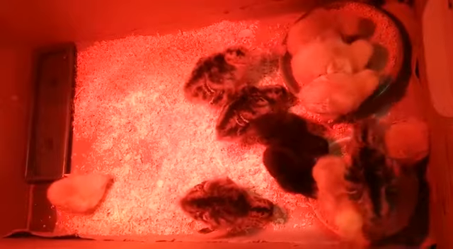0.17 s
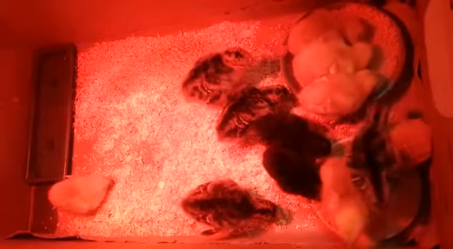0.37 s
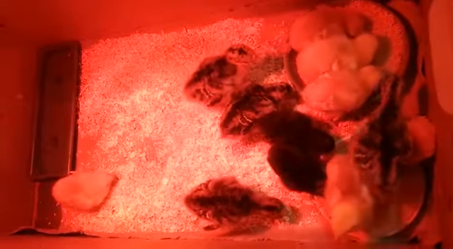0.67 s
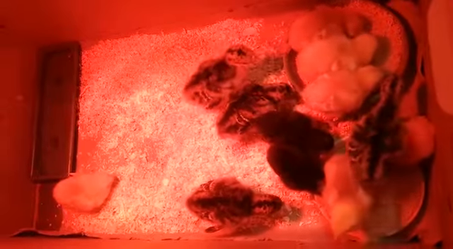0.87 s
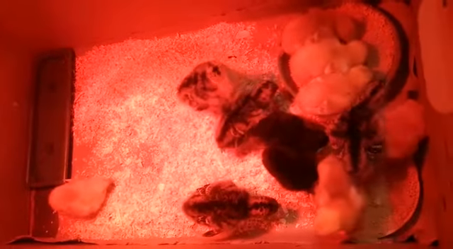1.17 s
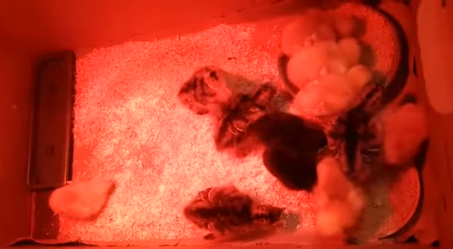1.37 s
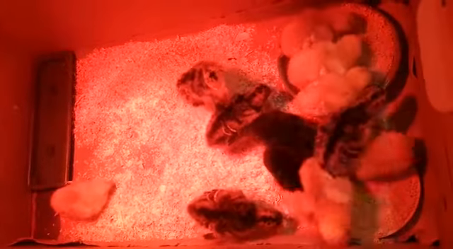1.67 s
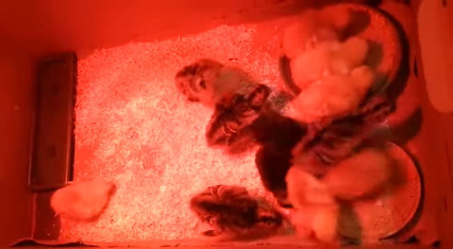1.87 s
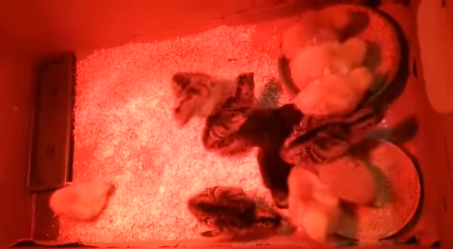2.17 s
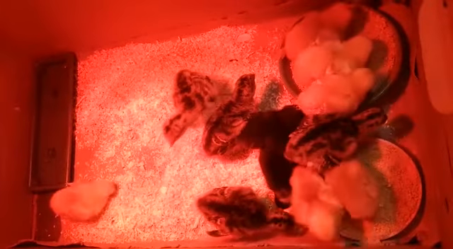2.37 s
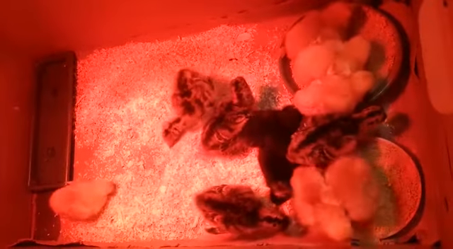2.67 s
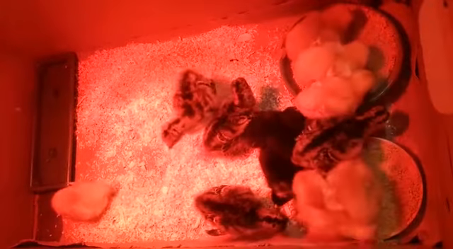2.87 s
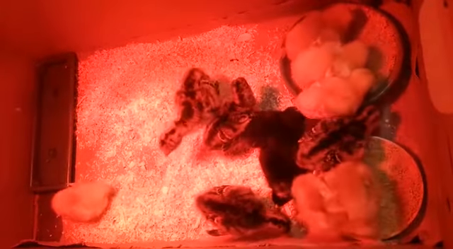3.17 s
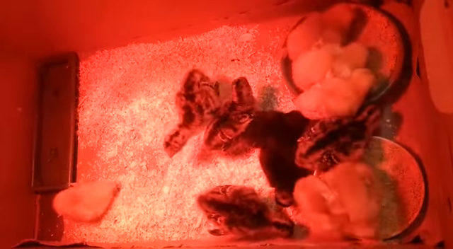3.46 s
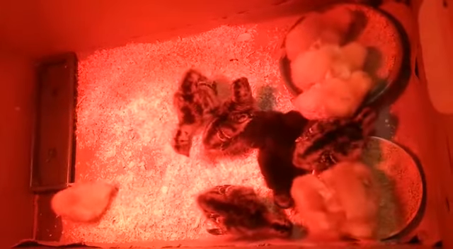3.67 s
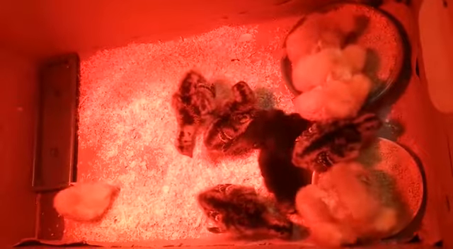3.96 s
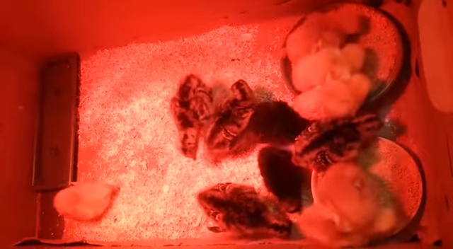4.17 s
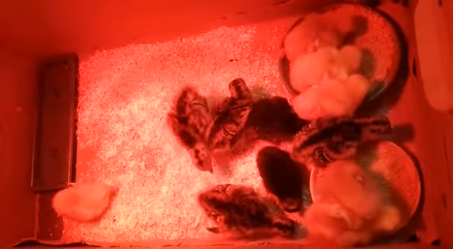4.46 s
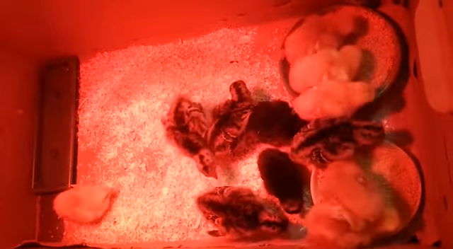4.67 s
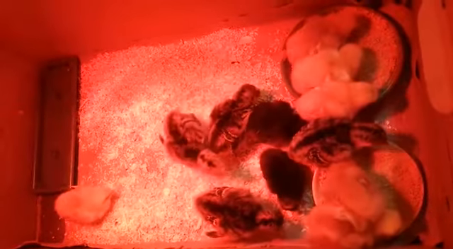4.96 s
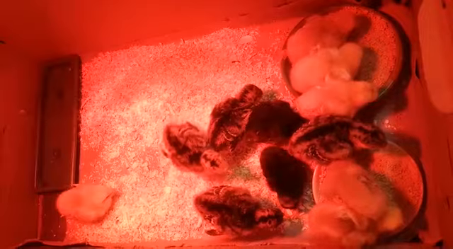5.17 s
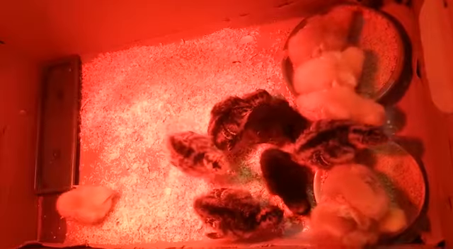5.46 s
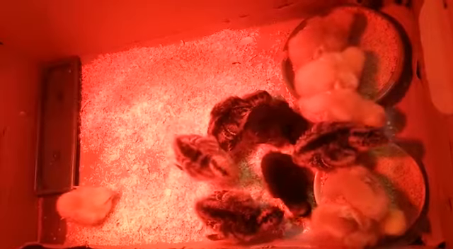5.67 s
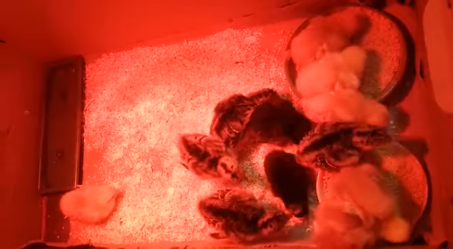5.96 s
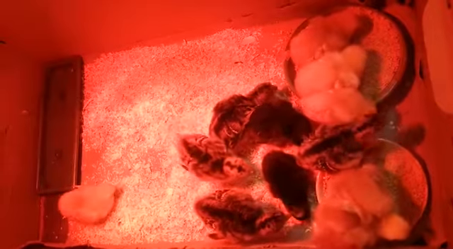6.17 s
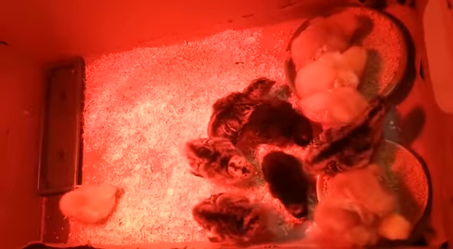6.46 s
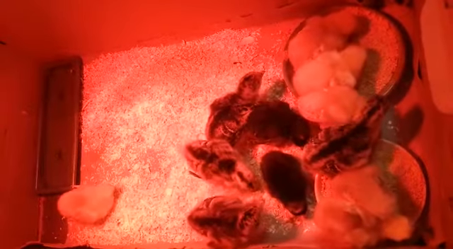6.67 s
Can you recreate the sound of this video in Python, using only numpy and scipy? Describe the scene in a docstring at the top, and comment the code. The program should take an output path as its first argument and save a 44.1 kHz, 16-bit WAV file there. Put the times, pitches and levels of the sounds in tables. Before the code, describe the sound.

Inside a plastic brooder box, chicks twitter with brief upturned peeps, irregular and overlapping. Pecking on the feeders comes in small gritty flurries, early on and strongest from about two to two and a half seconds, where feet also boom and knock on the box. Several loud descending cheeps follow in the middle. The end is lighter, with peeps in loose groups over soft rustling. Close stereo microphones above, leaning right; low room hum and hiss.

```python
"""A brood of young chicks twitters while feeding in a plastic brooder box, heard from just above it.
Whistled glides make the short, mostly upturned peeps, the louder falling cheeps and two faint whines.
Gritty noise bursts tick as beaks on the feeders; struck modes boom and knock as feet bump the box;
shaped noise scratches in the litter. Box and room echo the calls, ticks and bumps.
Below lie the hum and hiss of a small room."""
import sys
import numpy as np
from scipy import signal
from scipy.fft import rfft, irfft
from scipy.io import wavfile
from scipy.ndimage import uniform_filter1d

SR = 44100
rng = np.random.default_rng(int(sys.argv[2]) if len(sys.argv) > 2 else 0)


def store_pcm(level_fs):
    """Save levels as 16-bit WAV."""
    pcm = np.round(np.clip(level_fs, -1, 1) * 32767).astype(np.int16)
    wavfile.write(sys.argv[1], SR, np.atleast_2d(pcm).T)


N = 299880
TIME = np.arange(N) / SR


def undb(db):
    """Decibels to amplitude gain."""
    return 10 ** (np.asarray(db) / 20)


def unit(x):
    """Scale to rms 1."""
    return x / np.sqrt(np.mean(x ** 2))


def sides(pan_db):
    """Left and right gains, pan_db apart (left minus right), that keep the mean power."""
    gains = undb(np.array([[.5], [-.5]]) * pan_db)
    return gains / np.sqrt(np.mean(gains ** 2, axis=0))


def add(out, start_s, x):
    """Mix x into out from a start time."""
    i = max(int(start_s * SR), 0)
    out[:, i:i + x.shape[-1]] += x[..., :N - i]


def along(points, hz):
    """Read (Hz, dB) points on a log-frequency axis."""
    f, db = np.transpose(points)
    return np.interp(np.log(hz + 1), np.log(f), db)


def colour(x, points):
    """Causal minimum-phase filter with the given spectrum and unit power gain for white noise."""
    size = 4096
    bin_hz = np.arange(size // 2 + 1) * SR / size
    cepstrum = irfft(np.log(undb(along(points, bin_hz))))
    # folding the cepstrum onto positive time makes the filter causal
    cepstrum[1:size // 2] *= 2
    cepstrum[size // 2 + 1:] = 0
    h = irfft(np.exp(rfft(cepstrum)))
    return signal.fftconvolve(x, h[None] / np.linalg.norm(h))[:, :N]


def walk(rate):
    """Smooth random wander with rate knots per second, spread near 1.8."""
    knots = rng.standard_normal(8192)
    return 2.23 * np.interp(TIME * rate, np.arange(len(knots)), knots)


# Lean of the diffuse sound towards the right.
# Each row: frequency in Hz, left minus right in dB.
DIFFUSE_LEAN = [(100, -6.5), (1200, -5.5), (3000, -6.5), (5000, -1), (7500, -23), (10000, -7.5),
                (15000, -9)]


def spread(x, alike_hz=1900):
    """Two unrelated channels become alike in the bass and lean to the right."""
    hz = np.arange(N // 2 + 1) * SR / N
    mid, side = rfft(x)
    side = side * np.clip(hz / alike_hz, .08, 1)
    return irfft(np.array([mid + side, mid - side]) * sides(along(DIFFUSE_LEAN, hz)), N)


# Spectrum of the room's air. Each row: frequency in Hz, relative density in dB per Hz.
AIR_SPECTRUM = [(20, -11), (32, -15), (46, 5), (70, -9.5), (150, -21.5), (300, -21), (700, -23),
                (1500, -23), (3000, -27), (4500, -31), (7300, -32), (10000, -29.5), (15500, -32.5)]
# Mains hum. Each row: frequency in Hz, central rms level in dB.
MAINS_HUM = [(49, -68), (99, -67.5), (148, -72.5)]


def room_tone(air_db=-63, hum_pan_db=-5):
    """Noise gives soft rumble and hiss; sines wavering in level and phase give the mains hum."""
    air = spread(colour(rng.standard_normal((2, N)), AIR_SPECTRUM))
    air = air * undb(air_db + 1.2 * walk(1.8))
    hum = np.zeros(N)
    for hz, db in MAINS_HUM:
        level = undb(db + 3.3 * walk(50)) * np.sqrt(2)
        hum += level * np.sin(2 * np.pi * hz * TIME + 0.21 * walk(20))
    return air + hum * sides(hum_pan_db)


# Bouts of scratching in the litter.
# Each row: start in seconds, length in seconds, relative vigour in dB.
SCRATCH_BOUTS = [(0.009, 0.36, -60.5), (0.507, 1.23, -63), (0.723, 0.2, -54), (1.063, 0.44, -60),
                 (1.842, 0.33, -51), (2.23, 0.27, -56), (2.46, 0.25, -53), (2.799, 0.14, -55),
                 (3.44, 1.353, -64.5), (3.973, 0.33, -57), (5.39, 0.57, -64.5), (6.227, .18, -65)]
BOUT_ATTACK_S, BOUT_RELEASE_S = 0.037, 0.057
# stirring between the bouts; the faint stirring at which hiss, rustle and shuffle share one vigour
IDLE_DB, PIVOT_DB = -72, -66.5


def bustle():
    """Vigour of the scratching in dB: each bout sets in, holds and dies away."""
    power = undb(IDLE_DB) ** 2
    for start_s, length_s, db in SCRATCH_BOUTS:
        attack = np.clip((TIME - start_s) / BOUT_ATTACK_S + .5, 0, 1)
        release = np.exp(-np.maximum(TIME - start_s - length_s, 0) / BOUT_RELEASE_S)
        power = power + (undb(db) * attack * release) ** 2
    return 10 * np.log10(power)


def grains(rate, smooth):
    """Many tiny contacts of uneven size, rate per second, over a smoother rub of down."""
    hit = rng.random(N) < rate / SR
    size = undb(4 * np.minimum(rng.exponential(size=N), 4)) * hit
    return unit(rng.standard_normal((2, N)) * (unit(size) + smooth))


def burst(rise_s, fall_s, tail_db, tail_s):
    """A gritty contact followed by a weaker rattle, at both microphones."""
    t = np.arange(SR // 6) / SR
    grit = undb(2 * np.interp(t * 900, np.arange(512), rng.standard_normal(512)))
    decay = np.exp(-t / fall_s) + undb(tail_db) * np.exp(-t / tail_s)
    noise = rng.uniform(-np.sqrt(3), np.sqrt(3), (2, len(t)))
    return noise * grit * (1 - np.exp(-t / rise_s)) * decay


# Colours of the bright hiss, the middle rustle and the low shuffle of the litter.
# Each row: frequency in Hz, relative density in dB per Hz.
HISS_COLOUR = [(2000, -3.5), (3200, 9.5), (4600, 1.5), (6000, 8.5), (7500, 9), (9500, 1.5), (11000, 0.5),
               (13000, -2), (16000, 1.5)]
RUSTLE_COLOUR = [(250, 9.5), (500, 1.5), (800, -2.5), (1200, 2), (1800, 4.5), (2600, 3), (3600, -2.5),
                 (5000, -11), (9000, -30.5)]
SHUFFLE_COLOUR = [(60, -20), (110, 0.5), (160, 3.5), (260, -1.5), (400, -6.5), (800, -12.5), (2000, -44)]


def litter(hiss_db=1, rustle_db=0.0, shuffle_db=3, crumb_db=-1, rustle_growth=1.235, shuffle_growth=0.58):
    """Claws and down stir the litter as coloured noise, and crumbs tick; hard scratching favours rustle."""
    vigour = bustle()
    above_pivot = vigour - PIVOT_DB
    middle = PIVOT_DB + rustle_growth * above_pivot
    low = PIVOT_DB + shuffle_growth * above_pivot
    stir = walk(45)
    hiss = grains(rate=2400, smooth=1.7) * undb(vigour + hiss_db + 0.44 * stir)
    rustle = grains(rate=700, smooth=0.67) * undb(middle + rustle_db + 0.86 * stir)
    shuffle = rng.standard_normal((2, N)) * undb(low + shuffle_db + 1.05 * stir)
    drops = grains(rate=30, smooth=0)
    crumb = burst(rise_s=0.00094, fall_s=0.00067, tail_db=-30, tail_s=0.003)
    crumbs = unit(signal.fftconvolve(drops, crumb, axes=1)[:, :N]) * undb(vigour + crumb_db)
    stirred = colour(hiss, HISS_COLOUR) + colour(rustle, RUSTLE_COLOUR) + colour(shuffle, SHUFFLE_COLOUR)
    return spread(stirred + colour(crumbs, TICK_COLOUR))


def ring(modes, push_s):
    """Modes of the box after one scuffing blow; every place weights and detunes them a little."""
    t = np.arange(SR // 4) / SR
    hz, t60, db = np.transpose(modes)[:, :, None]
    detune, weight = rng.standard_normal((2, len(modes), 1))
    body = undb(db + 2 * weight - 60 * t / t60) * np.sin(2 * np.pi * hz * (1 + 0.041 * detune) * t)
    push = rng.standard_normal(len(t)) * np.exp(-t / push_s)
    x = signal.fftconvolve(body.sum(0), push)[:len(t)]
    # the panels radiate little below their lowest mode
    x = signal.sosfilt(signal.butter(3, hz.min(), "high", fs=SR, output="sos"), x)
    return x / np.std(x[:SR // 40])


# Resonances of the box, booming and knocking.
# Each row: nominal frequency in Hz, decay time t60 in seconds, relative level in dB.
BOOM_MODES = [(105.4, 0.45, -14), (158.2, 0.13, -1), (194.4, 0.13, 4), (263, 0.08, 0.5), (319, 0.12, -11)]
KNOCK_MODES = [(410, 0.078, 8), (454, 0.018, -54), (585, 0.048, 7.5), (694, 0.057, -5), (836.5, 0.024, 9.5),
               (1155, 0.012, 16), (1513, 0.027, 5.5)]
# Feet and bodies bumping the box.
# Each row: start in seconds, relative boom level in dB, relative knock level in dB.
BOX_BUMPS = [(0.232, -45.5, -49.5), (0.553, -41.5, -52.5), (1.173, -44, -70), (1.456, -36.5, -67),
             (1.851, -42, -40.5), (1.904, -38, -46.5), (2.011, -34, -36), (2.093, -34.5, -54),
             (2.182, -32.5, -46.5), (2.489, -39.5, -66), (2.581, -54, -39.5), (2.835, -42, -75),
             (3.555, -51.5, -45.5), (3.621, -38.5, -49), (3.974, -42.5, -41.5), (4.113, -45, -45.5),
             (4.542, -48.5, -47), (5.535, -67, -54), (5.973, -56, -52), (6.293, -49, -53.5)]


def bumps(boom_db=-3, knock_db=0, pan_db=-5.5):
    """Feet and bodies strike the box, whose low modes boom and middle modes knock."""
    out = np.zeros((2, N))
    for start_s, low_db, mid_db in BOX_BUMPS:
        boom = undb(low_db + boom_db) * ring(BOOM_MODES, push_s=0.0033)
        knock = undb(mid_db + knock_db) * ring(KNOCK_MODES, push_s=0.014)
        add(out, start_s, (boom + knock) * sides(pan_db))
    return out


# Colours of the beak's tick, the dish's tap and the grain's snap.
# Each row: frequency in Hz, relative density in dB per Hz.
TICK_COLOUR = [(1500, -22), (2800, -2.5), (4500, -11.5), (6000, -0.5), (7500, 1), (9500, -13.5),
               (13000, -21.5)]
TAP_COLOUR = [(200, -23), (600, -7), (950, -7), (1190, 0), (1400, -0.5), (2200, 1), (3400, -7),
              (5000, -9.5), (9000, -37)]
SNAP_COLOUR = [(6000, -22), (8500, -1.5), (11000, -1.5), (13000, -8), (15500, -10.5)]
# Beaks and claws on the feeders.
# Each row: start in seconds, relative strength in dB, brittleness of the grain from 0 to 1.
FEEDER_PECKS = [(.0428, -37.5, 0.83), (0.0794, -40, 0.77), (0.1038, -37, 0.33), (.152, -37, 0.6),
                (.164, -35, .25), (0.2352, -36.5, 0.84), (.294, -40, 0.77), (0.3159, -40, 0.72),
                (0.349, -41, 0.75), (0.7095, -31.5, 0.3), (0.7237, -31, 0.84), (.773, -35.5, .6),
                (.798, -31, 0.9), (0.8247, -30, 0.58), (.8834, -34, 0.55), (1.175, -37.5, 0),
                (1.4597, -34, 0.35), (1.4792, -40, 0.93), (1.8103, -39, 1), (1.8585, -30, 0),
                (1.8776, -31, 0.7), (1.9066, -26, 0.64), (1.9675, -33.5, 0), (1.998, -26.5, 0.92),
                (2.014, -21.5, 0.52), (2.087, -28.5, 0.6), (2.1818, -26.5, 0.7), (2.2906, -37, 0.65),
                (2.51, -34.5, 1), (2.5475, -20, 0.54), (2.5898, -22.5, 0.78), (2.7, -39.5, 0.4),
                (2.865, -34.5, 0.4), (3.5579, -36, 0.18), (3.648, -32.5, 0.6), (3.979, -40, 0.15),
                (4.0316, -35.5, 0.7), (4.1146, -26.5, 0.87), (4.249, -48, 0.76), (4.3326, -40, 0),
                (5.455, -37, 0.63), (5.5396, -38, 0), (5.6463, -35, 0.62), (5.697, -35, 0.62),
                (5.781, -35.5, 0.91)]
# a brittle grain snaps more and passes less of the blow to the dish
BRITTLE_SNAP_DB, BRITTLE_TAP_DB = 29.5, -12


def pecks(tick_db=5, tap_db=-2, snap_db=-19, tick_pan_db=-19):
    """A bright tick of beak on grain, the snap of the grain and a duller tap of the dish below."""
    ticks, taps, snaps = np.zeros((3, 2, N))
    for start_s, db, brittle in FEEDER_PECKS:
        tick = burst(rise_s=0.0011, fall_s=.0016, tail_db=-19.0, tail_s=0.012)
        tap = burst(rise_s=0.00062, fall_s=0.0064, tail_db=-7, tail_s=0.01)
        snap = burst(rise_s=0.00087, fall_s=0.00067, tail_db=-17, tail_s=0.009)
        add(ticks, start_s, tick * undb(db + tick_db))
        add(taps, start_s, tap * undb(db + tap_db + BRITTLE_TAP_DB * brittle))
        add(snaps, start_s, snap * undb(db + snap_db + BRITTLE_SNAP_DB * brittle))
    bright = colour(ticks, TICK_COLOUR) + colour(snaps, SNAP_COLOUR)
    return bright * sides(tick_pan_db) + spread(colour(taps, TAP_COLOUR))


def walls(x, wall_db, first_s=0.001046, last_s=0.01, count=6):
    """Each spot in the box has its own few wall reflections to each microphone."""
    x = np.pad(x, ((0, 0), (0, 2048)))  # room for the last echoes
    out, index = x.copy(), np.arange(x.shape[1])
    for channel in range(2):
        for lag_s in rng.uniform(first_s, last_s, count):
            out[channel] += undb(wall_db) * np.interp(index - lag_s * SR, index, x[channel], left=0)
    return out


def syrinx(hz, db, pan_db, overtone_db, wall_db, burr=0, burr_hz=450, jitter=0.0076, flutter_db=2.3,
           edge_s=0.0023):
    """One nearly pure whistle with weak overtones and a slight tremble; a burr chops it into fast beats."""
    t = np.arange(len(hz)) / SR
    tremble, flutter, drift = (np.interp(t * 450, np.arange(512), rng.standard_normal(512)) for _ in range(3))
    phase = 2 * np.pi * np.cumsum(hz * (1 + jitter * tremble)) / SR
    # the path to the two microphones differs with the place of the bird
    phase = phase + np.array([[0], [1]]) * rng.uniform(-2.9, 0.85)
    tone = np.sin(phase)
    for k, over_db in enumerate(overtone_db, 2):
        # overtones share the treble colour of the box and flare as they slide through its peak
        level = undb(over_db + along(HISS_COLOUR, k * hz))
        tone += level * np.sin(k * phase) * (k * hz < SR / 2)
    # the second side of the syrinx beats with the first: strands below the pitch, a weak one above
    beat = 2 * np.pi * np.cumsum(burr_hz * (1 + 0.25 * drift)) / SR
    strands = .8 * np.sin(phase - beat) + .3 * np.sin(phase - 2 * beat) + .2 * np.sin(phase + beat)
    tone = (tone + burr * strands) / np.sqrt(1 + burr ** 2 / 2)
    gate = np.sin(np.pi / 2 * np.clip(np.minimum(t, t[-1] - t) / edge_s, 0, 1)) ** 2
    return walls(tone * gate * undb(db + flutter_db * flutter) * sides(pan_db), wall_db)


# Faint thin whines.
# Each row: start in seconds, length in seconds, first pitch in Hz, last pitch in Hz, relative level in dB.
THIN_WHINES = [(1.589, .13, 2030, 2310, -62.5), (6.472, 0.226, 2090, 1904, -70.5)]


def whines(gain_db=3, fade_db=9, pan_db=-8):
    """Faint slow whistled glides that swell and fade."""
    out = np.zeros((2, N))
    for start_s, length_s, first_hz, last_hz, db in THIN_WHINES:
        u = np.linspace(0, 1, int(length_s * SR))
        hz = first_hz + (last_hz - first_hz) * u
        level_db = db + gain_db - fade_db * (2 * u - 1) ** 2
        add(out, start_s, syrinx(hz, level_db, pan_db, overtone_db=[], wall_db=-11))
    return out


# Standing waves in the box colour a whistle and can move it between the microphones.
# Each row: frequency in Hz, full gain in dB, left minus right in dB.
BOX_WAVES = [(2000, 0, -7), (2450, 1.5, -16), (2830, 3, -19), (3080, -4, -8), (3250, -1, -13),
             (3480, 3, -7), (3660, -2.5, 1), (3820, 0, 12)]


def standing_waves(hz):
    """Gain and lean in dB that the box gives a moving pitch, smoothed over about 6 ms."""
    at_hz, *columns = np.transpose(sorted(BOX_WAVES))
    return [uniform_filter1d(np.interp(hz, at_hz, db), size=250, mode="nearest") for db in columns]


# Falling cheeps. Each row: start in seconds, length in seconds, top pitch in Hz, shoulder pitch in Hz,
# relative level at the top in dB, relative level at the shoulder in dB.
FALLING_CHEEPS = [(2.355, 0.095, 3034, 2620, -33.5, -24.5), (2.824, 0.11, 3870, 3244, -25, -24),
                  (3.323, 0.12, 3550, 2950, -38.5, -21.5), (3.815, .117, 3650, 2886, -29, -22.5),
                  (4.425, 0.081, 3650, 2930, -34.5, -33)]
ARCH_S, ARCH_DEPTH = 0.023, 0.1215  # a cheep climbs to its top from this share below
DROP_S, END_HZ = .029, 1947  # after the shoulder the pitch drops away


def cheeps(gain_db=3, onset_db=9, fade_db=17, swell_power=1.3, fade_power=2.8):
    """Longer calls arch over, sag to a shoulder with a level glide, then drop away."""
    out = np.zeros((2, N))
    for start_s, length_s, top_hz, shoulder_hz, top_db, shoulder_db in FALLING_CHEEPS:
        t = np.arange(int((length_s + 0.005) * SR)) / SR
        shoulder_s = length_s - DROP_S
        climb = np.interp(t, [0, ARCH_S], [0, 1])
        sag = np.interp(t, [ARCH_S, shoulder_s], [0, 1])
        drop = np.interp(t, [shoulder_s, length_s], [0, 1])
        hz = top_hz * (1 - ARCH_DEPTH * (1 - climb) ** 2)
        hz = hz + (shoulder_hz - top_hz) * sag + (END_HZ - shoulder_hz) * drop ** 1.36
        hz = uniform_filter1d(hz, size=300, mode="nearest")
        db = top_db - onset_db * (1 - climb) ** 2
        db = db + (shoulder_db - top_db) * sag ** swell_power - fade_db * drop ** fade_power
        # the octave grows when the pitch is pressed high
        octave_db = -36 + 16 * np.clip((hz - 3560) / 250, 0, 1)
        wave_db, lean_db = standing_waves(hz)
        call = syrinx(hz, db + gain_db + wave_db, lean_db, overtone_db=[octave_db, -45, -50],
                      wall_db=-41, jitter=0.0012, flutter_db=2.4)
        add(out, start_s, call)
    return out


# Short peeps. Each row: start in seconds, time to the top in seconds, knee pitch in Hz, top pitch in Hz,
# relative level at the knee in dB, relative level at the top in dB.
SHORT_PEEPS = [(0.159, .02, 2900, 3670, -46, -42), (.216, 0.039, 2865, 4360, -39, -45),
               (.416, .032, 2370, 3770, -35.5, -40), (0.503, 0.039, 2517, 4320, -31.5, -46),
               (.498, 0.059, 2794, 3100, -38.5, -43), (.552, .024, 3400, 4380, -48, -47),
               (0.592, 0.068, 2460, 3500, -35.5, -53), (0.739, 0.017, 3080, 3640, -45, -38),
               (.888, 0.023, 2210, 2530, -32, -37), (0.966, 0.017, 2290, 3250, -38, -54),
               (1.03, 0.016, 2360, 3440, -40.5, -43), (1.089, 0.029, 3690, 4220, -43.5, -50),
               (1.107, 0.036, 3280, 4380, -37, -43.5), (1.161, .035, 3120, 3330, -43, -45),
               (1.252, 0.044, 2500, 3200, -35.5, -41.5), (1.307, 0.042, 2660, 3770, -42, -33),
               (1.397, 0.021, 3140, 4100, -39.5, -44.5), (1.894, 0.073, 2765, 3530, -39, -41),
               (2.019, 0.039, 2650, 3795, -33, -37), (2.164, 0.062, 2587, 3410, -30.5, -49),
               (2.346, .015, 2520, 3350, -36, -42), (2.534, 0.04, 2480, 3756, -34, -29),
               (2.586, .045, 2550, 3820, -37.5, -35), (2.743, 0.021, 2510, 3160, -45, -40),
               (2.81, 0.046, 2504, 3430, -34.5, -31), (2.812, 0.05, 3250, 3340, -40, -29),
               (3.122, 0.034, 2510, 4020, -43, -32), (3.291, 0.025, 2465, 3310, -44.5, -41),
               (3.44, .042, 2677, 3660, -32, -34.5), (3.614, 0.064, 2500, 3540, -28.5, -48.5),
               (3.739, 0.02, 2450, 3220, -34.5, -48), (3.81, 0.028, 2450, 3530, -28, -55),
               (3.886, 0.022, 2454, 3164, -26, -27.5), (3.99, 0.03, 3200, 3834, -34, -32.5),
               (4.074, 0.027, 2640, 3540, -41.5, -41), (4.155, .028, 3000, 4280, -45, -42.5),
               (4.187, 0.033, 3040, 3730, -42, -43), (4.228, 0.043, 2780, 4070, -41.5, -53),
               (4.287, 0.03, 2417, 2340, -30, -30), (4.324, .023, 2430, 3390, -35, -37),
               (4.373, 0.021, 2410, 3080, -35.5, -65), (4.541, 0.068, 2550, 3565, -33, -37.5),
               (4.621, .035, 3160, 3866, -40, -34), (4.659, 0.028, 2530, 3230, -37.5, -41),
               (4.736, .027, 2473, 3500, -35.5, -34.5), (5.082, .041, 3000, 4030, -39.5, -48.5),
               (5.092, .04, 3414, 4400, -48.5, -56), (5.263, 0.043, 3060, 4185, -37.5, -39),
               (5.297, 0.039, 3280, 4230, -41, -54), (5.362, 0.06, 2534, 3540, -31, -46),
               (5.505, 0.041, 2690, 4030, -45.5, -44), (5.526, 0.03, 2520, 3760, -34, -39),
               (5.731, .03, 2266, 2580, -36.5, -41), (5.769, 0.0337, 2524, 2476, -36, -36),
               (5.807, 0.015, 2350, 3410, -33.5, -34.5), (5.881, 0.048, 2925, 4320, -34, -49),
               (5.946, .036, 2830, 3543, -37, -30), (6.124, 0.064, 2537, 3580, -34, -48),
               (6.201, 0.031, 2960, 4060, -45, -43), (6.239, 0.028, 2585, 3420, -38.5, -51),
               (6.314, 0.027, 2495, 3400, -33.5, -49), (6.35, .024, 2590, 3540, -34, -36),
               (6.383, 0.03, 2480, 3230, -31, -52), (6.698, 0.038, 2880, 4060, -45, -55)]
CREEP, CREEP_PER_S = 0.0843, 1.184  # a peep starts this share below its knee, and more the longer it is held
FLICK_S, USUAL_TOP_HZ = .016, 3460  # the flick takes longer when it reaches above the usual top
CLEAN_BELOW_HZ, BURR_SPAN_HZ, BURR_MAX = 2600, 700, 0.69  # the voice grows rough as the knee gets higher


def peeps(gain_db=3.0, overshoot=1.65, fade_db=12, onset_db=6, early_db=2, pan_db=-9, wave_share=0.11,
          press_db=17):
    """Each peep creeps up to a knee, then most flick upward and a few level off or dip; all fade at the end."""
    out = np.zeros((2, N))
    for start_s, to_top_s, knee_hz, top_hz, knee_db, top_db in SHORT_PEEPS:
        rise = min(FLICK_S * (top_hz / USUAL_TOP_HZ) ** 1.504, 0.98 * to_top_s)
        hold = max(to_top_s - rise, .001)
        end = hold + overshoot * rise
        t = np.arange(int(end * SR)) / SR
        creep = np.clip(t / hold, 0, 1) ** 0.644
        flick = np.abs(np.sin(np.pi / 2 * np.clip((t - hold) / rise, 0, 2))) ** 1.513
        hz = knee_hz * (1 - (CREEP + CREEP_PER_S * hold) * (1 - creep)) + (top_hz - knee_hz) * flick
        db = np.interp(t, [0, hold / 2, hold, hold + rise, end],
                       [knee_db - onset_db, knee_db - early_db, knee_db, top_db, top_db - fade_db])
        # a high knee sets off a burr; a clean peep pressed up high grows a strong octave
        burr = np.clip((knee_hz - CLEAN_BELOW_HZ) / BURR_SPAN_HZ, 0, BURR_MAX)
        press = np.clip((top_hz - 3600) / 400, 0, 1) * flick
        octave_db = -33.5 + press_db * (1 - burr) * press
        wave_db, _ = standing_waves(hz)
        call = syrinx(hz, db + gain_db + wave_share * wave_db, pan_db, overtone_db=[octave_db, -44, -48],
                      wall_db=-19 + 7.5 * burr, burr=burr * np.sqrt(flick), jitter=0.011)
        add(out, start_s, call)
    return out


def reverb(x, box_db=-14, box_t60=0.12, room_db=-25, room_t60=0.22):
    """Decaying noise gives the short ring of the box and the weak tail of the room."""
    t = np.arange(SR // 2) / SR
    wet = 0
    for db, t60 in ((box_db, box_t60), (room_db, room_t60)):
        h = rng.standard_normal((2, len(t))) * undb(-60 * t / t60) * np.clip(t / 0.0033, 0, 1)
        wet = wet + undb(db) * h / np.linalg.norm(h[0])
    # the right channel alone feeds both tails
    return signal.fftconvolve(x[1][None], wet)[:, :N] * sides(pan_db=-7.5)


def scene(cheep_wet_db=-2):
    """The birds and their bustle in the box; the loud cheeps reach the microphones most directly."""
    calls = cheeps()
    small = peeps() + whines() + pecks() + bumps()
    echoes = reverb(small + undb(cheep_wet_db) * calls)
    return calls + small + echoes + litter() + room_tone()


def record(dry, top_hz=15800):
    """The recorder cuts the top with a steep low-pass."""
    return signal.sosfilt(signal.ellip(10, .2, 75, top_hz, fs=SR, output="sos"), dry)


dry = scene()
out = record(dry)
store_pcm(out)
```